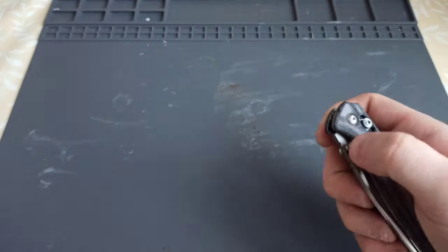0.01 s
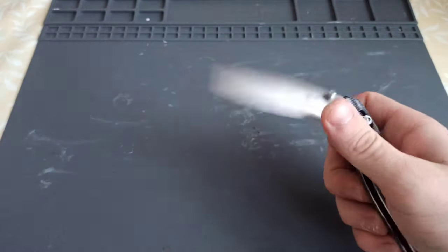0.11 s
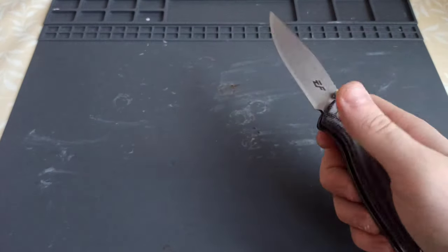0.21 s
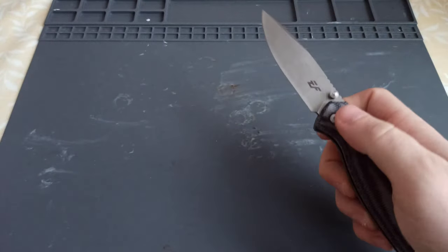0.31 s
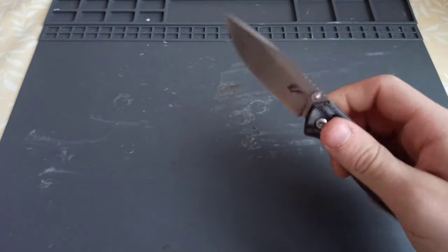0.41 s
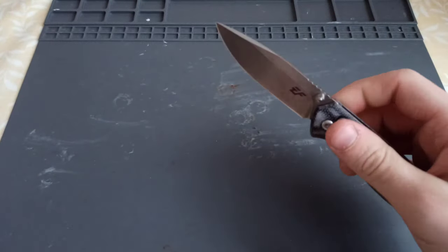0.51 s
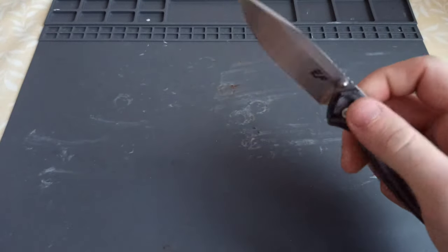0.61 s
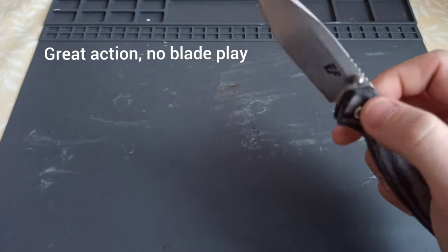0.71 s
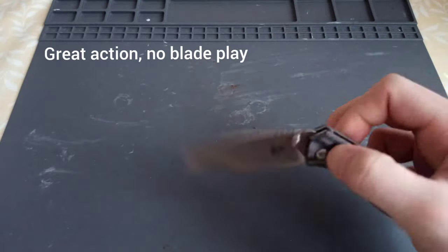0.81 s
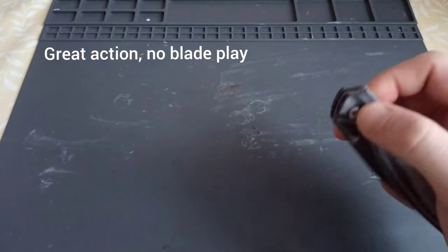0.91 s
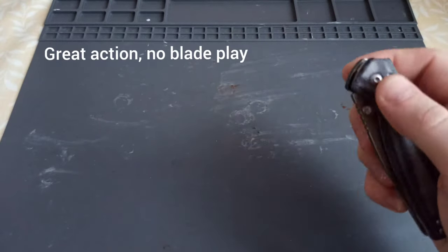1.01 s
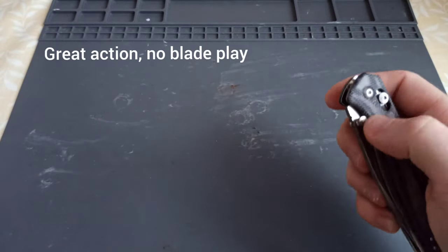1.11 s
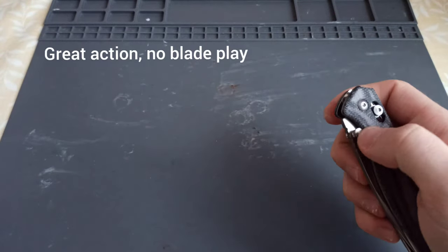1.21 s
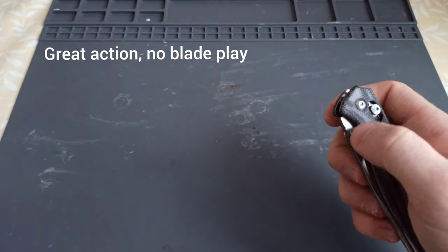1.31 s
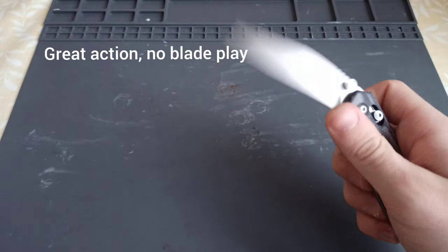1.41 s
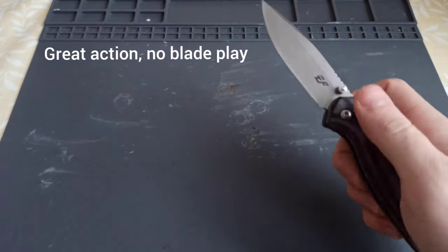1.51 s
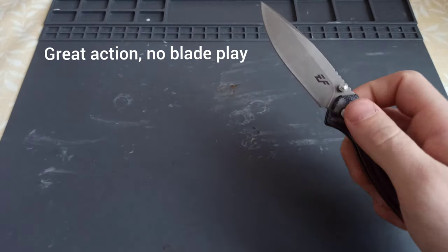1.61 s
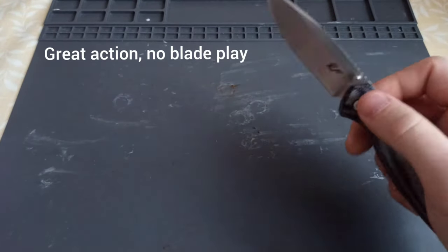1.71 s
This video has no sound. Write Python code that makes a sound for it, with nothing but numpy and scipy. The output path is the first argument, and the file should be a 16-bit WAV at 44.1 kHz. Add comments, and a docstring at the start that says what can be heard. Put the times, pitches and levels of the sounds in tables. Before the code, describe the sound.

A folding knife is flicked open with a tick, brief whirr and bright steel clack, then unlocked and snapped shut, and finally flicked open again, close to the microphone above a workbench in a small room.

```python
"""In a small room, close above a workbench, a folding knife is flicked open, snapped shut and flicked open again.
Each flick is a detent tick, a short whirr of the pivot and the clack of the blade on its stop and lock.
To close, the lock slips off the blade and the blade drops into the handle.
Blows are short noisy clicks, filtered and joined by ringing steel; swings and finger rubs are grainy noise.
The bench sends back one reflection, the room adds dying echoes, and a faint rumble and hiss lie underneath."""
import sys
import numpy as np
from scipy import signal
from scipy.fft import rfft, irfft
from scipy.io import wavfile
from scipy.ndimage import uniform_filter1d

SR = 44100
rng = np.random.default_rng(int(sys.argv[2]) if len(sys.argv) > 2 else 0)


def int16_out(signal):
    """Quantize to a 16-bit WAV file."""
    q = np.round(np.clip(np.atleast_2d(signal).T, -1, 1) * 32767)
    wavfile.write(sys.argv[1], SR, q.astype(np.int16))


N = 79380  # samples, 1.8 s

# All levels are relative. Every colour table lists: pitch_hz, level_db
# Faint steady background of the room: pitch_hz, level_db
AIR_COLOUR = [(20, -72.5), (45, -68.5), (75, -48.5), (130, -46), (330, -51.5), (700, -58.5), (1500, -65.5),
              (4000, -70.5), (7000, -73.5), (10000, -76), (15000, -71.5)]
# How long the echoes take to fall by 60 dB: pitch_hz, fall_time_s
ROOM_FALL_TIMES = [(300, 0.45), (800, 0.4543), (2000, 0.24), (4000, 0.294), (6000, 0.235), (8000, 0.23),
                   (13000, 0.21)]
# Colour of the echoes: pitch_hz, level_db
ROOM_COLOUR = [(200, -7.5), (700, -8), (1200, -10.5), (3500, -6), (5500, -1), (6400, -2), (7400, -9),
               (8300, -5.5), (14000, -7.5)]
# Colour added by the microphone: pitch_hz, level_db
MIC_COLOUR = [(25, -9), (80, 1), (4500, 0), (5000, -2.5), (5950, -5.5), (6150, 3), (7600, 4.5), (7900, 0.5),
              (8450, 2), (8650, -12), (10200, -15), (10700, -15.5), (11400, -23), (11700, -1), (15350, -2),
              (15900, -30)]

# The hand bumps the handle softly: start_s, level_db
BUMPS = [(.148, 1.5), (1.243, -7)]
# Fingers rub the grip: start_s, length_s, level_db, dull_part_db
RUBS = [(0.393, .14, -66.5, -18), (0.606, 0.057, -72.5, -17), (0.807, .06, -61.5, -17),
        (1.188, 0.036, -67, 6.5), (1.233, .045, -66.5, 7.5), (1.28, 0.042, -69, 6.5)]
# Colour of the bright part of a rub: pitch_hz, level_db
RUB_COLOUR = [(100, -19), (2000, -21.5), (4000, 1.5), (7300, 3.5), (10000, -10.5), (15000, -6)]
# Colour of the dull part of a rub: pitch_hz, level_db
DULL_RUB_COLOUR = [(50, -11.5), (250, 17.5), (600, 3.5), (1800, -3), (3000, 6), (5500, -1), (15000, -31)]
# Pivot whirrs as the blade swings: start_s, length_s, level_db, low_whirr_hz (before the glide), low_whirr_db
SWINGS = [(0.135, .062, -41, 2194, -8.5), (1.428, 0.061, -41.5, 2373, -2.5)]
# Colour of the pivot's scrape: pitch_hz, level_db
SWING_COLOUR = [(100, -4), (1200, -13), (2500, -4), (3400, 6.5), (5000, -7), (6500, 3), (8300, -4),
                (10000, -7), (15000, -6)]
# Small ticks of detent and lock bar: start_s, level_db, low_ring_db (before a shared trim), top_ring_db
TICKS = [(0.1266, -34.5, 20.5, -16), (0.1314, -20.5, 12, -20.5), (0.7891, -32, 5, -15),
         (.869, -31.5, 3, -14), (0.9423, -8.5, -16, -2), (0.9446, -10, -12.5, 13), (1.197, -43, 8.5, -15),
         (1.242, -43.5, 12, -27.5), (1.391, -35.5, 11, -8), (1.425, -13.5, 9, -20)]
# Colour of a tick: pitch_hz, level_db
TICK_COLOUR = [(100, -15.5), (700, -20), (1500, -23.5), (2300, -14), (4200, -16.5), (5100, -1.5),
               (5700, -2.5), (7000, -1), (8500, -4.5), (12000, -16), (16000, -12.5)]
# Low resonance of the lock bar: pitch_hz, width_hz (of one pass; it is used twice)
LOCK_BAR_LOW = (3500, 900)
# Top resonance of the lock bar: pitch_hz, width_hz
LOCK_BAR_TOP = (13850, 200)

# Lock bar slips off the blade: start_s, level_db
RELEASES = [(.881, -23), (.8855, -13), (.8865, -18.5)]
# Colour of the lock bar slipping: pitch_hz, level_db
RELEASE_COLOUR = [(100, -41.5), (1850, -26), (2150, 2), (2500, -5), (3100, -29), (4500, -16.5), (5200, -8),
                  (6000, -4.5), (7000, 6.5), (7600, 4.5), (8200, -15), (13500, -15), (16000, -13)]
# Blade lands in the handle, with a graze before and a rebound after: start_s, level_db
SHUTS = [(0.959, -13), (0.9649, 2), (0.9664, 7.5), (.992, -6), (.995, -6.5)]
# Colour of the landing: pitch_hz, level_db
SHUT_COLOUR = [(60, -34), (250, -18), (400, -16), (680, -14.5), (900, -4.5), (1250, -26), (1550, -25),
               (2150, -19), (4200, -6.5), (5500, -4.5), (6300, -3), (7450, 2.5), (8300, -5.5), (9800, -3),
               (12500, -10), (16000, -15)]
# Blade locks open: start_s, level_db, handle_knock_db
OPENS = [(0.2053, 9, 0.5), (1.4948, 9.5, 3)]
# Two contacts in each opening clack, stop pin then lock: delay_s, level_db
OPEN_CONTACTS = [(0, -6.5), (.0009, -2)]
# Colour of the opening clack: pitch_hz, level_db
OPEN_COLOUR = [(100, -22.5), (700, -32.5), (1950, -16.5), (2400, -13), (3000, -8.5), (3900, -1), (4600, -9),
               (5500, 1.5), (6400, 2.5), (7000, -2), (7550, 2.5), (8300, -2.5), (9500, -7.5), (12200, -14),
               (13500, -10.5), (15200, -12.5)]
# Colour of the handle's knock: pitch_hz, level_db
KNOCK_COLOUR = [(40, -17.5), (130, -11), (400, -11), (660, -19.5), (850, 3), (1100, -2), (1650, -0.5),
                (1950, -25.5), (4000, -39)]
# Ringing tones of the steel: pitch_hz, level_db, fall_time_s (to fall by 60 dB)
STEEL_TONES = [(870, -59, .2), (1617, -55, .2), (3149, -56, .2), (3902, -49, .2), (5040, -50, .18),
               (5470, -48, .16), (5750, -49.5, .19), (6280, -51, .17), (6536, -53, .17), (6710, -52, .16),
               (7520, -39, .05)]


def amp(db):
    """Turns decibels into a plain multiplier."""
    return 10 ** (np.asarray(db) / 20)


def read(points, hz):
    """Reads a table of values between its pitches, on a log-frequency axis."""
    f, value = np.transpose(points)
    return np.interp(np.log(hz + 1), np.log(f + 1), value)


def add(mix, start_s, sound):
    """Mixes a sound in at a time, cutting off what runs past the end."""
    part = mix[max(round(start_s * SR), 0):][:len(sound)]
    part += sound[:len(part)]


def colour(x, points, size=4096):
    """Filters a sound to the given spectrum, with no response before the sound arrives."""
    hz = abs(np.fft.fftfreq(size, 1 / SR))
    log_gain = np.log(amp(read(points, hz)))
    # minimum phase: the filter's energy comes as early as it can
    response = np.exp(np.conj(signal.hilbert(log_gain)))
    taps = np.fft.ifft(response).real[:size // 2]
    return signal.fftconvolve(x, taps)[:len(x)]


def resonate(x, hz, width_hz):
    """One resonance with a gain of about 1 at its pitch; a narrower one rings longer."""
    turn = np.exp(2j * np.pi * np.cumsum(hz * np.ones(len(x))) / SR)
    keep = np.exp(-np.pi * width_hz / SR)
    # shift the pitch down to zero, smooth, then shift back up
    smooth = signal.lfilter([1 - keep], [1, -keep], x / turn + 1e-18)
    return 2 * (turn * smooth).real


def contact(size=1024, chatter_s=0.0027, chatter_db=3):
    """Hard parts touch: an impulse, then a few milliseconds of chatter, with an even spectrum."""
    t = np.arange(size) / SR
    x = rng.standard_normal(size) * np.exp(-t / chatter_s)
    x *= amp(chatter_db) / np.linalg.norm(x)
    x[0] += 1
    spectrum = rfft(x)
    nearby_power = uniform_filter1d(abs(spectrum) ** 2, size=9)
    even = irfft(spectrum / np.sqrt(nearby_power))
    return np.pad(even[:size // 2], (0, SR // 4))  # silence leaves time to ring


def friction(length_s, grain_db, peak):
    """Tiny slips of uneven size under a stroke that peaks at a share of its length."""
    u = np.linspace(0, 1, round(length_s * SR))
    grain_size = amp(grain_db * np.minimum(rng.exponential(1, N), 5))
    slips = (rng.standard_normal(N) * grain_size)[:len(u)]
    stroke = np.interp(u, [0, np.clip(peak, .05, .95), 1], [0, 1, 0])
    return slips / slips.std() * stroke


def whirr(hz, jitter):
    """A rough stick-slip tone whose pitch jitters from moment to moment."""
    wobble = uniform_filter1d(rng.standard_normal(len(hz)), size=40)
    jittered_hz = hz * (1 + jitter * wobble / wobble.std())
    return np.sin(2 * np.pi * np.cumsum(jittered_hz) / SR)


def steel(size=16384):
    """Blade and liners ring on after a blow as a sum of fading tones."""
    t = np.arange(size) / SR
    return sum(amp(db - 60 * t / fall_s) * np.sin(2 * np.pi * hz * t) for hz, db, fall_s in STEEL_TONES)


def air():
    """A faint steady rumble and hiss, made of filtered noise."""
    return colour(rng.standard_normal(N + 2048), AIR_COLOUR)[-N:]  # drop the filter's start-up


def room(x, wet_db, size=22050, hold_s=0.015, echo_start_s=.004, bench_s=.0027, bench_db=-13):
    """A reflection from the bench, then dense echoes that hold briefly and die away."""
    hz, t, echoes = signal.stft(rng.standard_normal(size), SR, nperseg=256)
    fall_s = read(ROOM_FALL_TIMES, hz)[:, None]
    echoes = echoes * amp(-60 * np.maximum(t - hold_s, 0) / fall_s)
    tail = signal.istft(echoes, SR, nperseg=256)[1]
    tail = colour(tail / np.linalg.norm(tail), ROOM_COLOUR)
    out = x.copy()
    add(out, bench_s, amp(bench_db) * x)
    add(out, echo_start_s, amp(wet_db) * signal.fftconvolve(x, tail))
    return out


def bumps(thud_hz=135, width_hz=50):
    """Dull thuds of the hand on the handle: contacts passed twice through a low resonance."""
    out = np.zeros(N)
    for start_s, db in BUMPS:
        thud = resonate(contact(), thud_hz, width_hz)
        add(out, start_s, amp(db) * resonate(thud, thud_hz, width_hz))
    return out


def fingers():
    """Skin slides over the textured grip in many tiny slips, part bright and part dull."""
    out = np.zeros(N)
    for start_s, length_s, db, dull_db in RUBS:
        rub = friction(length_s, grain_db=2.5, peak=.45)
        dull = amp(dull_db) * colour(rub, DULL_RUB_COLOUR)
        add(out, start_s, amp(db) * (colour(rub, RUB_COLOUR) + dull))
    return out


def pivot(high_whirr_hz=3130, high_whirr_db=-1, glide=.1, jitter=0.057):
    """The pivot scrapes and sings two rough tones, which sag and sound most in the first half of the swing."""
    out = np.zeros(N)
    for start_s, length_s, db, low_hz, low_db in SWINGS:
        scrape = friction(length_s, grain_db=2.5, peak=.38)
        u = np.linspace(0, 1, len(scrape))
        swell = np.interp(u, [0, .3, .7, 1], [0, 1, 0, 0])
        bend = 1 + glide * (.3 - u)  # both pitches start high and sag
        high = amp(high_whirr_db) * whirr(high_whirr_hz * bend, jitter)
        low = amp(low_db) * whirr(low_hz * bend, jitter)
        add(out, start_s, amp(db) * (colour(scrape, SWING_COLOUR) + swell * (high + low)))
    return out


def ticks(low_trim_db=-5):
    """Light contacts of the detent ball ring the lock bar at a low and a top resonance."""
    out = np.zeros(N)
    for start_s, db, low_db, top_db in TICKS:
        hit = contact()
        low = resonate(resonate(hit, *LOCK_BAR_LOW), *LOCK_BAR_LOW)
        top = resonate(hit, *LOCK_BAR_TOP)
        ring = amp(low_db + low_trim_db) * low + amp(top_db) * top
        add(out, start_s, amp(db) * (colour(hit, TICK_COLOUR) + ring))
    return out


def closing(ring_db=-16):
    """The lock bar slips aside; the blade lands in the handle, with a weaker ring than on opening."""
    out = np.zeros(N)
    for start_s, db in RELEASES:
        add(out, start_s, amp(db) * colour(contact(), RELEASE_COLOUR))
    for start_s, db in SHUTS:
        add(out, start_s, amp(db) * colour(contact(), SHUT_COLOUR))
        add(out, start_s, amp(db + ring_db) * steel())
    return out


def opening(ring_db=-6):
    """The blade hits its stop, the lock snaps in, the handle knocks and the steel rings."""
    out = np.zeros(N)
    for start_s, db, knock_db in OPENS:
        for delay_s, contact_db in OPEN_CONTACTS:
            add(out, start_s + delay_s, amp(db + contact_db) * colour(contact(), OPEN_COLOUR))
        lock_s = start_s + OPEN_CONTACTS[-1][0]  # knock and ring start with the lock
        add(out, lock_s, amp(knock_db) * colour(contact(), KNOCK_COLOUR))
        add(out, lock_s, amp(db + ring_db) * steel())
    return out


def scene():
    """The knife in the room over steady air; the openings throw the most sound into the room."""
    handling = bumps() + fingers() + pivot() + ticks()
    mix = air() + room(handling, wet_db=1)
    mix += room(closing(), wet_db=-3.5)
    mix += room(opening(), wet_db=1.5)
    return mix[None]


def record(dry, edge_hz=16400):
    """A small microphone with a treble peak and a deep dip above it, then a cut of the highest treble."""
    heard = colour(dry[0], MIC_COLOUR)
    low_pass = signal.firwin(255, edge_hz, window=("kaiser", 9), fs=SR)
    return signal.oaconvolve(heard, low_pass, "same")[None]


dry = scene()
out = record(dry)
int16_out(out)
```